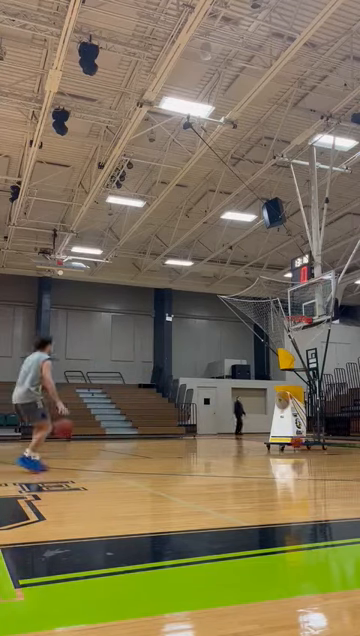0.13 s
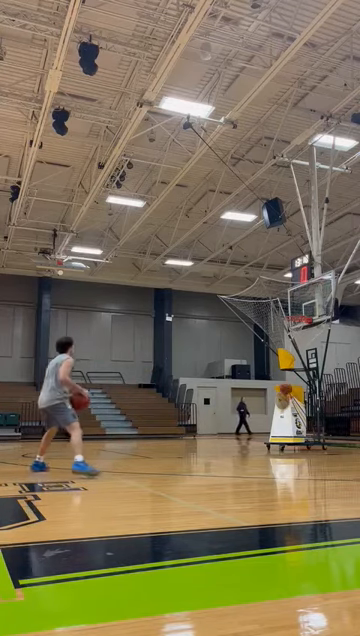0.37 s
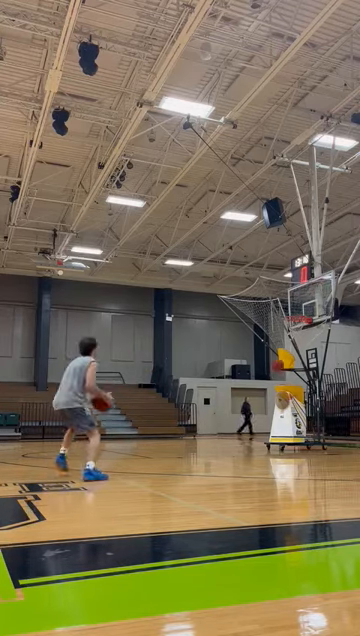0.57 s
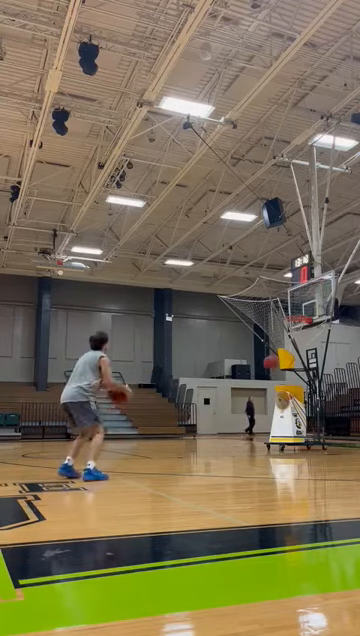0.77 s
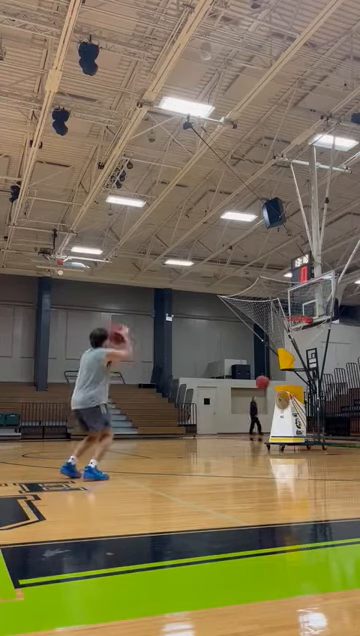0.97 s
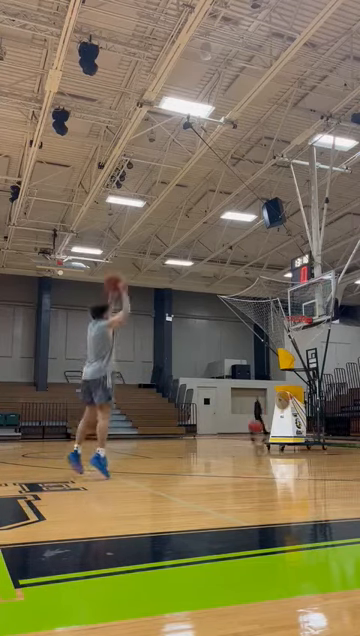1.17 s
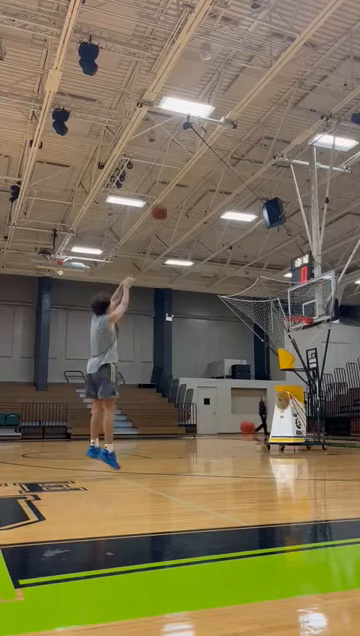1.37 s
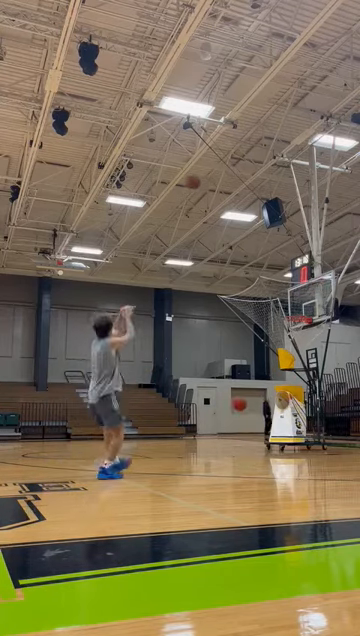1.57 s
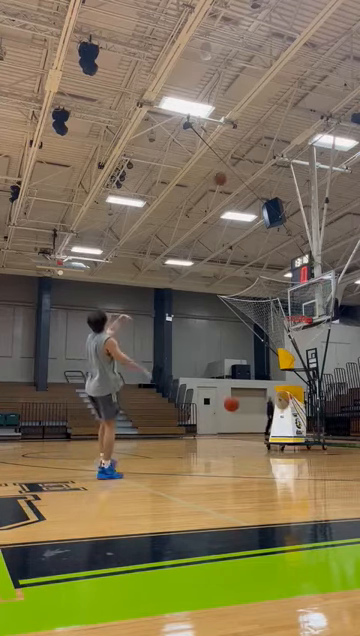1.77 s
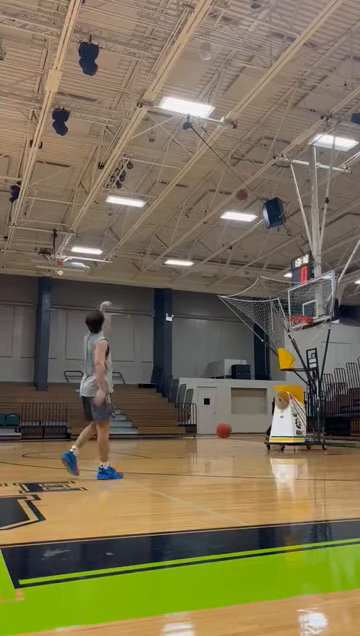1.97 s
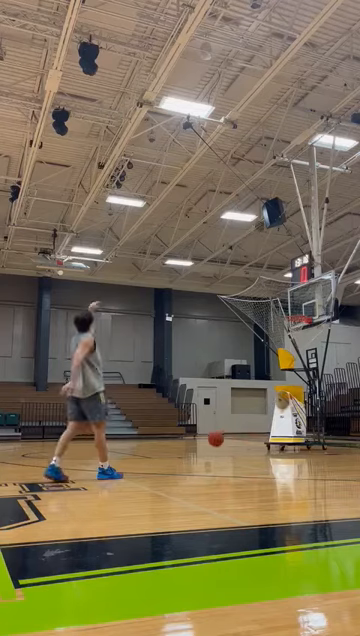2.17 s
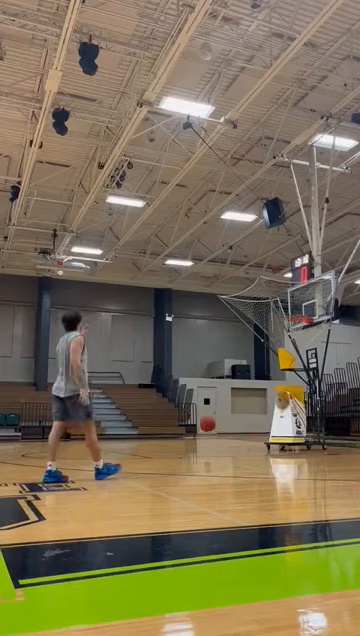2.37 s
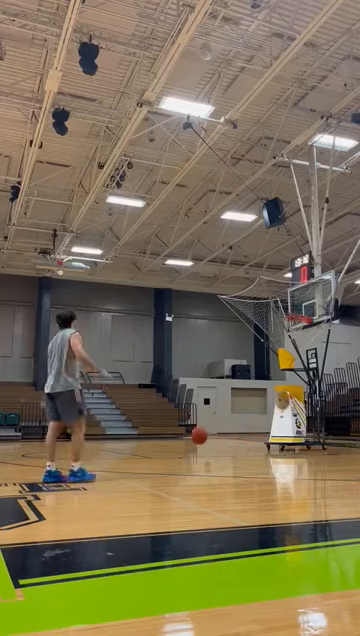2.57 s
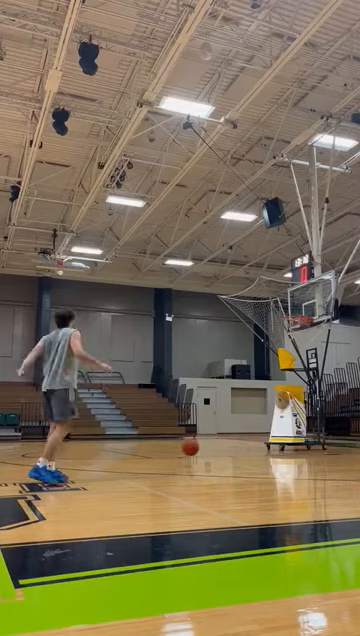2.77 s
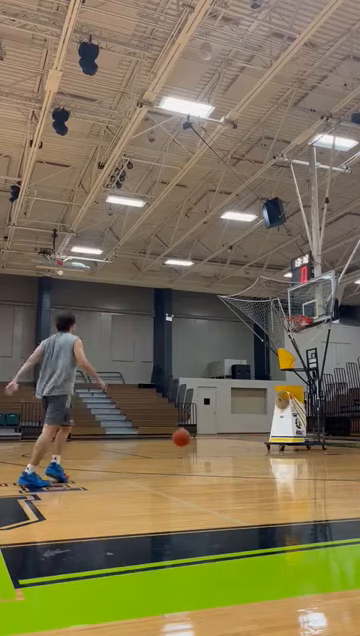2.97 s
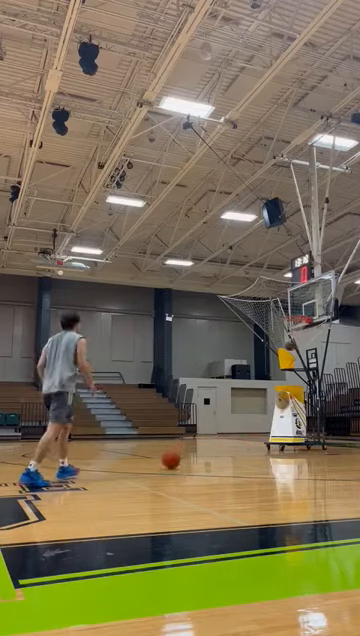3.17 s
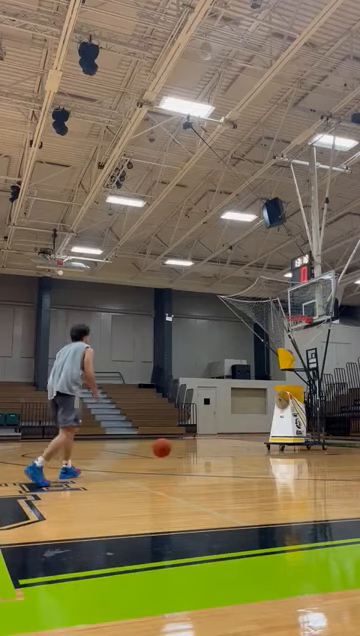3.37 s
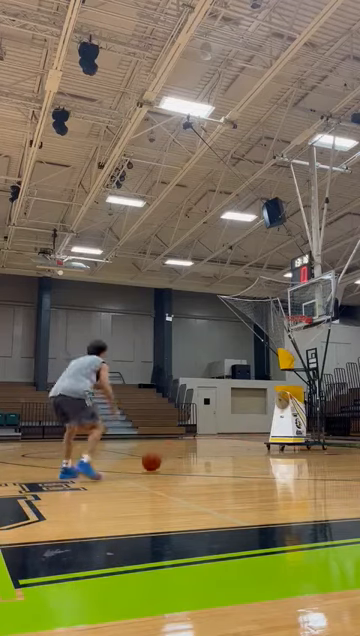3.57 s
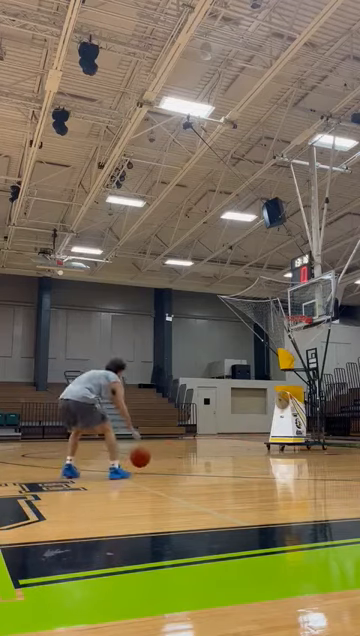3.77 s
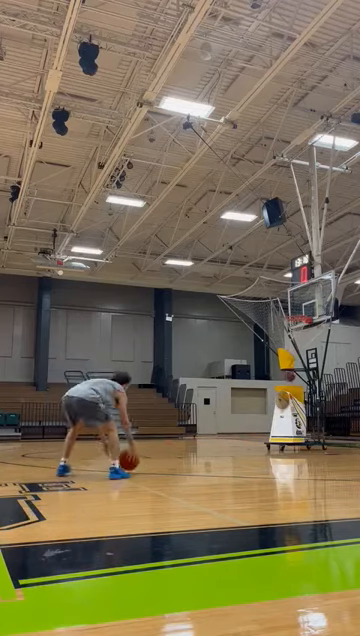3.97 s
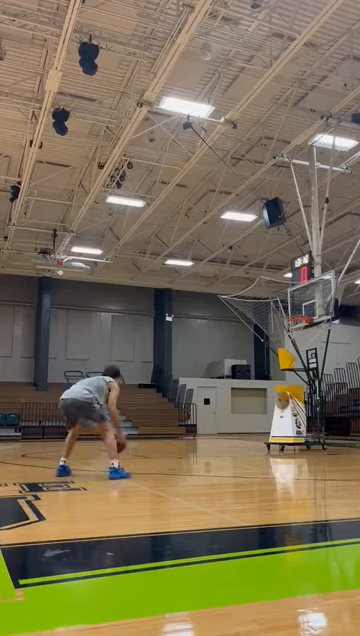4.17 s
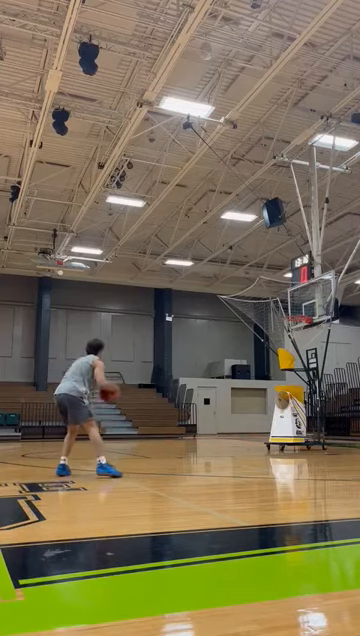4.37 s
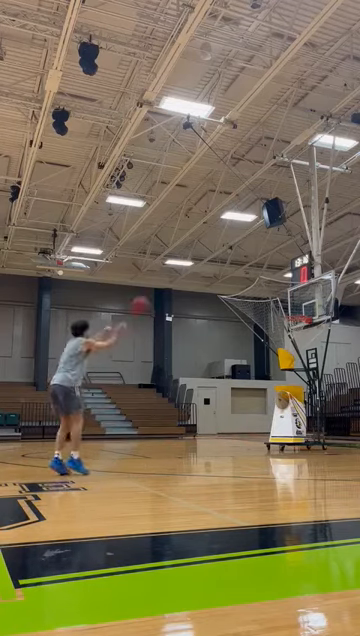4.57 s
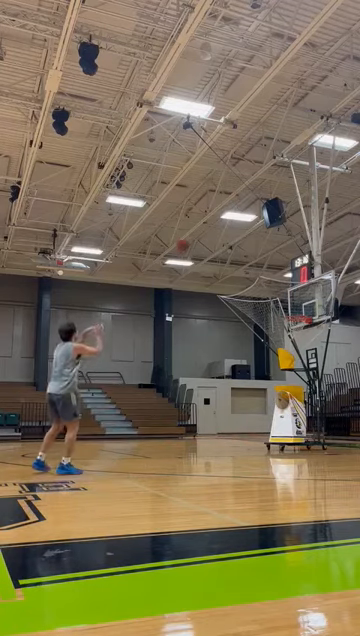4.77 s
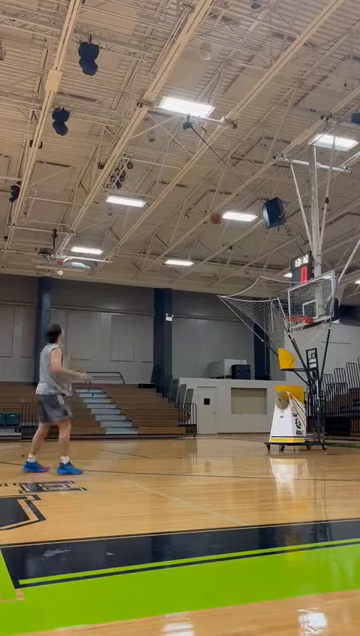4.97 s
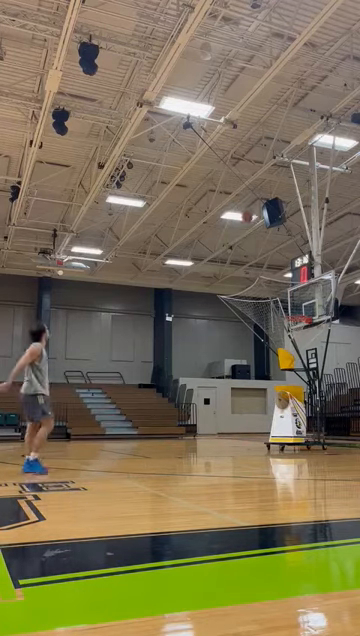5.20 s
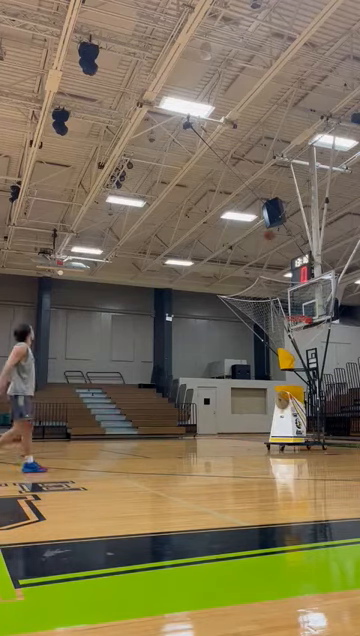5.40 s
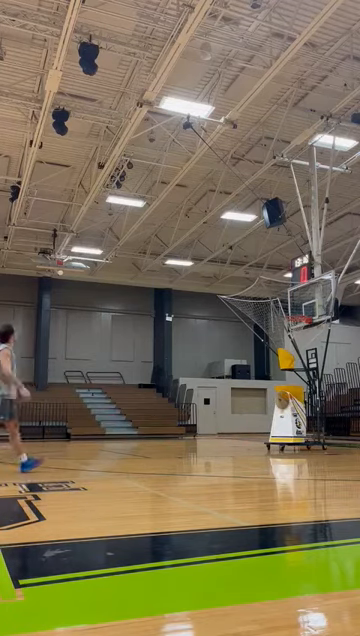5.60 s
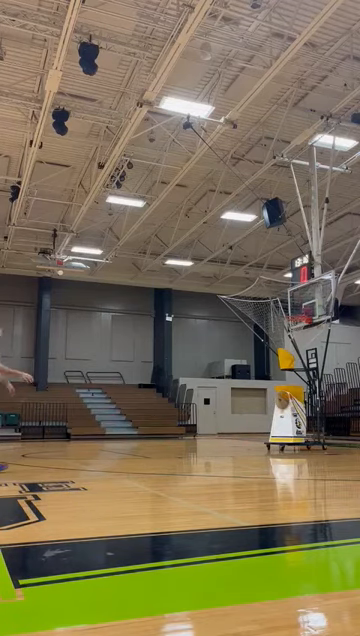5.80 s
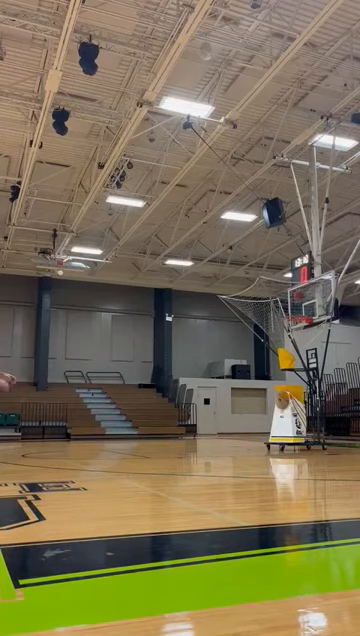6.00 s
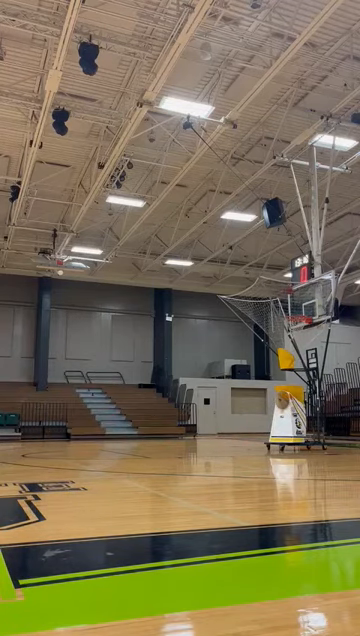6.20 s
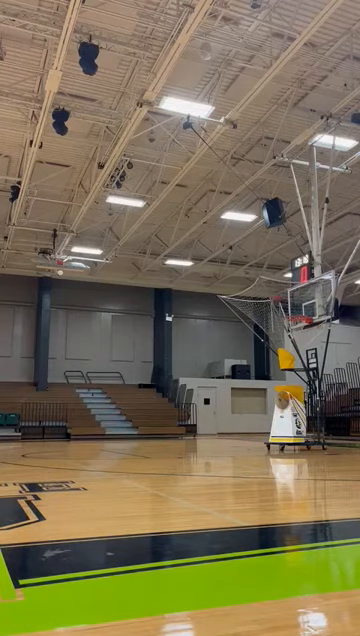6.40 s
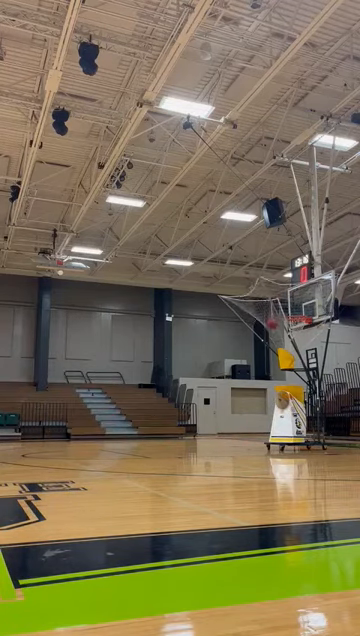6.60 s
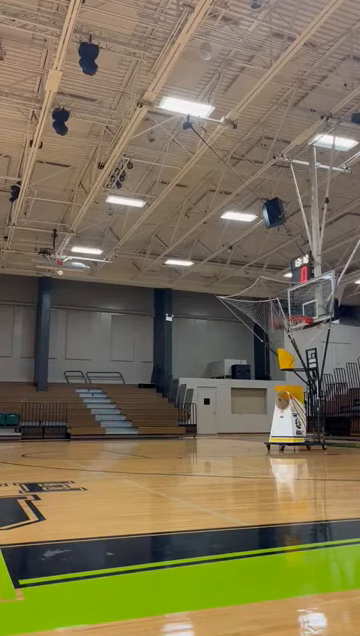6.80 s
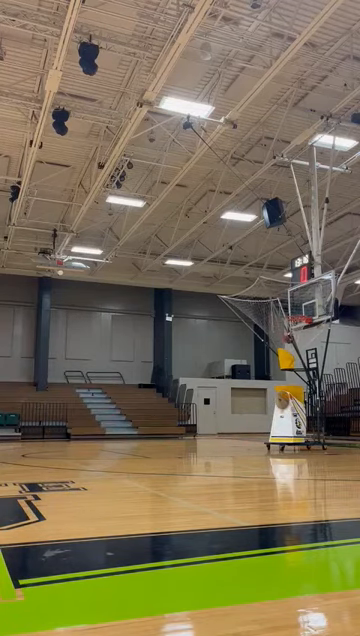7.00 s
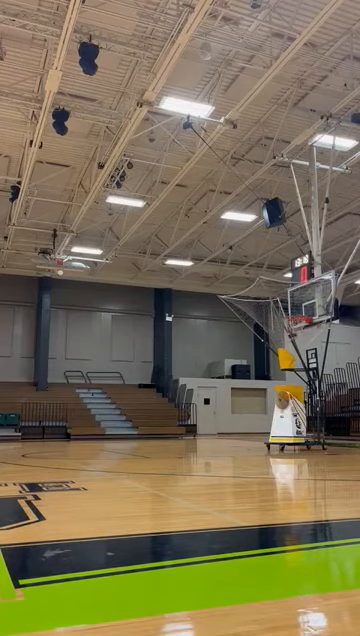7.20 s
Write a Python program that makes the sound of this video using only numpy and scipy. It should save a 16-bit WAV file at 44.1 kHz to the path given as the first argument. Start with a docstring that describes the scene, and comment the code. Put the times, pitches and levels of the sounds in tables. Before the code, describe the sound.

A basketball bounces unevenly on hardwood in an echoing gym, with brief shoe squeaks, metal clinks and a thud against the backboard.

```python
"""Ventilation and mains hum fill a large gym, heard through a phone's two microphone ports.
From 0.1 s a basketball bounces: its skin slaps, the air inside rings, the sprung hardwood thumps.
Soles squeak, dull thumps sound; the hall rings. At 2.6 s a shot drops into a catching net: poles
knock, cord rustles, the metal frame clinks. At 5.9 s the hoop shivers and the backboard thuds;
more low thumps, metal clinks and one dull echo follow."""
import sys
import numpy as np
from scipy import signal
from scipy.fft import rfft, irfft, next_fast_len
from scipy.io import wavfile
from scipy.ndimage import uniform_filter1d

SR = 44100
rng = np.random.default_rng(int(sys.argv[2]) if len(sys.argv) > 2 else 0)


def file_out(sig):
    """Save sig as 16-bit WAV at sys.argv[1]."""
    # one column per channel
    cols = np.atleast_2d(sig).T
    # limit, then scale
    lim = np.clip(cols, -1, 1)
    pcm = np.round(lim * 32767).astype(np.int16)
    wavfile.write(sys.argv[1], SR, pcm)


N = 319725

# ventilation spectrum: f/Hz, level/dB
VENT_TONE = [(15, -65), (25, -6), (47, 5.5), (124, -5), (148, -9.5), (181, -11.5), (251, -15), (277, -15.5),
             (425, -13), (519, -18), (619, -20), (3760, -35), (7040, -48), (10000, -65), (13000, -109),
             (22000, -120)]
# mains hum: f/Hz, rms level/dB
HUM_LINES = [(59.2, -51.5), (118.4, -49.5), (172.3, -56), (290.7, -60.5), (484.5, -64.5)]
# ball blows: t/s, slap level/dB, thump, sheen and hall send/dB re slap, left minus right/dB,
# lowest air mode/Hz, bending wave delay at 100 Hz/s
BALL_HITS = [(0.108, -16, 7, -5, 19.5, 1.5, 1300, 0.00693), (0.119, -29.5, -6.5, -6, 10, 1.5, 1310, 0.0094),
             (0.192, -15.5, 4.5, -12.5, 21.6, 0, 1076, 0.01362),
             (1.3283, -16.5, 0.5, -14, 18.2, 3, 1050, .011), (2.15, -26, 6.5, -14, 15.5, 3, 1210, 0.00828),
             (2.16, -31.5, -5, -13, 8, -1.5, 1180, 0.0084), (2.633, -38, -0.5, -9, 18, 3.5, 1400, .01),
             (2.691, -33, 2, -8, 26, -3, 1460, .01), (2.768, -26.5, 8, -31, 12.4, 0.5, 1340, 0.00648),
             (3.253, -34, 9.5, -0.5, 19, -1, 1300, 0.00805), (3.627, -35, 6, -4, 24.4, 1.5, 1660, 0.0077),
             (3.917, -41.5, 6, -9, 24, -2, 1160, 0.0078), (4.047, -46, -6, -16.5, 30, 0, 1130, .008),
             (5.9, -32.5, -3, -8, 20, 0.5, 1170, 0.01097), (5.917, -31, 6.5, -2, 21, 3, 1330, 0.00824)]
# air in the ball: f/lowest mode, level/dB
BALL_MODES = [(1.002, 8.5), (1.45, -8), (2.1, -18.5), (3.1, -8.5), (4.2, -14)]
# sprung boards: f/thump pitch, level/dB, t60/s
BOARD_MODES = [(0.651, -22.5, 0.1), (0.999, 12.5, 0.038), (1.5, 7.5, 0.025), (2.101, 7.5, 0.023),
               (3.502, 2.5, 0.015), (5.299, -3.5, 0.035)]
# spectra of a bounce: f/Hz, level/dB
SHEEN_TONE = [(1500, -31.5), (3500, 8.5), (8000, 5.5), (12000, -23.5)]  # pebbled rubber
SMACK_TONE = [(300, -18), (700, -13.5), (1500, 13.5), (3500, -14), (6000, -24.5), (10000, -8)]  # skin meeting the floor
KNOCK_TONE = [(90, -27.5), (200, 7), (400, -1.5), (900, -0.5), (1800, -3), (3500, -30.5)]  # blow carried by the boards
SLAP_SEND_TONE = [(100, -21), (250, -9), (600, 6.5), (1300, -1), (2500, -7), (5000, -12.5), (9000, -21)]  # slap averaged over all directions
# slipping soles: t/s, length/s, start f/Hz, end f/Hz, level/dB, octave/dB re tone, waver/0-1,
# hall send/dB, stick-slip depth/0-1
SOLE_SLIPS = [(0.198, 0.018, 4454, 4256, -30.5, 1.5, 0.2, -3.5, 0.8),
              (2.88, 0.016, 4230, 4110, -37.5, -37, 0.1, -11, .05),
              (2.921, 0.032, 4250, 4230, -36.5, -21, 0, -17, .05),
              (4.54, 0.04, 4500, 4264, -41, -17, 0.2, -21, 0.5),
              (4.553, 0.022, 4140, 4554, -39, -3.5, 0.14, -2, 0.3)]
# dull low thumps, some with a light tap: t/s, thump level/dB, thump f/Hz, tap level/dB
LOW_THUMPS = [(0.484, -25.5, 80.5, -29.5), (0.535, -35, 88, -36.5), (0.734, -26.5, 139.7, -32.5),
              (0.817, -32, 108.5, -58), (1.652, -34, 65, -52), (1.775, -35, 103, -54),
              (2.195, -21.5, 86, -55), (2.981, -22, 88.5, -39), (3.294, -31.5, 100, -55),
              (4.179, -34.5, 74.3, -54.5), (5.792, -32.5, 78.6, -63), (5.974, -22.5, 72.3, -50.5),
              (6.069, -23.5, 84, -46), (6.2, -26, 93.4, -56), (6.439, -30.5, 84.3, -52.5)]
# light tap: f/Hz, level/dB
TAP_TONE = [(250, -5), (500, 5), (1100, 1.5), (2000, -21.5), (4000, -40.5)]
# jolts of the net's poles: t/s, level/dB, tilt/(dB/octave)
POLE_JOLTS = [(2.633, -43, 12), (2.693, -42, 17), (2.71, -45, 21), (2.845, -31, -6), (2.863, -38.5, 1),
              (2.952, -29, -0.5), (2.99, -37, 5), (3.02, -30, -9.5)]
# pole resonances: f/Hz, level/dB, t60/s
POLE_MODES = [(276.7, 0.5, 0.12), (873, 1, 0.087), (1386, -9, 0.09)]
# net and clothes moving: t/s, hold/s, rustle level/dB, stand shake level/dB
RUSTLES = [(2.639, 0.024, -45, -40), (2.7, 0.031, -42.5, -38), (2.759, 0.2, -48, -37.5),
           (2.999, 0.33, -58, -43.5), (4.2, 0.22, -56.5, -48), (4.56, 0.16, -57.5, -56),
           (4.779, 0.23, -62, -46), (4.892, 0.042, -56.5, -69), (5.904, 0.028, -44, -38),
           (5.96, 0.24, -60, -43)]
# rustle spectra: f/Hz, level/dB
RUB_TONE = [(500, 4.5), (1200, 2), (3000, -1), (5000, -5), (8000, -8), (10000, -7)]  # cord and cloth; also joint chatter
STAND_TONE = [(50, 4.5), (90, 2.5), (200, -5.5), (300, -4.5), (500, -12), (900, -13.5), (1500, -19),
              (3000, -46)]  # shaken stand
# metal clinks and one dull echo (7.195 s):
# t/s, level/dB, left minus right/dB, ringing share/0-1, tilt/(dB/octave)
METAL_CLINKS = [(2.8349, -30, -1, 0.58, 7), (2.949, -29.5, 0, 0.39, 0.1), (3.371, -42.5, 3, 0.7, 0.1),
                (3.4096, -26, 0, 0.79, -0.3), (4.1722, -43.5, -5, 0.05, -6), (6.241, -51, 4, 0.44, 5),
                (6.5889, -32, 0, 0.76, 0.5), (6.6824, -39.5, 0, 0.62, -2), (6.8777, -47.5, 7, 0.43, 1),
                (7.1503, -23, 1, 0.85, 3.5), (7.195, -29, -1, 0.9, -5.5), (7.2444, -31.5, 4, 0.84, 1)]
# frame tubes: f/Hz, level/dB, t60/s
TUBE_MODES = [(1525, -3, 0.081), (2440, -1, 0.058), (3468, 0.5, 0.05), (4584, 1.5, 0.045),
              (5520, -29, 0.045), (6570, 3, 0.067), (7230, 3, 0.02), (8125, 15, 0.018), (9320, 12, 0.025)]
# hoop striking its board: t/s, level/dB
HOOP_SHIVERS = [(5.901, -32.5), (5.924, -37.5), (5.939, -43), (6.012, -44), (6.038, -44.5)]
# hoop resonances: f/Hz, level/dB, t60/s
HOOP_MODES = [(1300, -5, 0.037), (2230, 1.5, 0.039), (3660, 0, 0.021)]
# hall decay: f/Hz, t60/s
HALL_DECAY = [(40, 0.24), (80, 2.1), (160, 1.5), (320, 1.8), (640, 1.14), (1280, 1.82), (2560, 1.81),
              (4300, 1.43), (6000, 1.17), (9000, 0.8)]
# hall and phone responses: f/Hz, level/dB
TAIL_TONE = [(40, 5), (100, 0.5), (160, -1.5), (220, -3.5), (285, 0), (360, 0), (480, 0), (580, 6),
             (690, -2.5), (880, -4), (1300, -5), (2500, -1), (4500, 1.5), (8000, 0)]
ROOF_ECHO_TONE = [(150, -15.5), (400, -9.5), (620, 3), (900, -9), (2000, 1), (6000, 0.5), (9000, -15)]
MIC_RESPONSE = [(15, -37.5), (60, 0.5), (5000, 4), (6300, 0.5), (9000, 0), (10000, -16), (11500, -1),
                (12500, -50.5)]
# stereo width of diffuse sound, very wide near 6 kHz: f/Hz, side over mid/dB
STEREO_WIDTH = [(100, -87.5), (250, -27.5), (500, -4.5), (1500, -3.5), (2500, 0.5), (5500, -4.5),
                (5900, 22), (6600, 42.5), (7000, -11), (8900, -8), (9600, 18)]

HIT_SAMPLES = 8192
HIT_TIME_S = np.arange(HIT_SAMPLES) / SR
SPOTS = 3  # floor positions, each with its own hall response


def undb(db):
    return 10 ** (np.asarray(db) / 20)


def unit(x):
    return x / np.abs(x).max()


def impulse(at_sample):
    return signal.unit_impulse(HIT_SAMPLES, at_sample)


def at_bins(table, size):
    """(f/Hz, value) rows interpolated to FFT bins."""
    hz, value = np.transpose(table)
    return np.interp(np.log(np.fft.rfftfreq(size, 1 / SR) + 1), np.log(hz), value)


def colour(x, table):
    """Zero-phase filter from (f/Hz, level/dB) rows."""
    size = next_fast_len(x.shape[-1] + 4096)
    return irfft(rfft(x, size) * undb(at_bins(table, size)), size)[..., :x.shape[-1]]


def ring(modes, spread, size=HIT_SAMPLES, tilt_db_oct=0):
    """Decaying sines, each detuned at random by a relative spread."""
    t, out = np.arange(size) / SR, 0
    for hz, db, t60_s in modes:
        sine = np.sin(2 * np.pi * hz * (1 + spread * rng.standard_normal()) * t)
        out = out + undb(db + tilt_db_oct * np.log2(hz)) * sine * np.exp(-np.log(1000) * t / t60_s)
    return out


def place(bus, start_s, direct, send, pan_db=0, spot=0):
    """Add to bus rows left, right (one sample later) and the spot's hall send."""
    left, right = direct * undb(pan_db / 2), direct * undb(-pan_db / 2)
    for row, part, lag in (0, left, 0), (1, right, 1), (2 + spot, send, 0):
        i = int(start_s * SR) + lag
        bus[row, i:i + len(part)] += part[:N - i]


def diffuse(pair):
    """Two unrelated signals become left and right, with a stereo width set by frequency."""
    size = next_fast_len(N)
    power_ratio = undb(2 * at_bins(STEREO_WIDTH, size))
    gains = np.sqrt([1 / (1 + power_ratio), power_ratio / (1 + power_ratio)])
    mid, side = irfft(rfft(pair, size) * gains, size)[:, :N]
    return np.array([mid + side, mid - side])


def ventilation(rms_db=-41.5):
    """Broad air noise from all sides."""
    air = colour(rng.standard_normal((2, N)), VENT_TONE)
    return diffuse(air / air.std() * undb(rms_db))


def mains_hum():
    """Steady sines, equal left and right."""
    t = np.arange(N) / SR
    return sum(np.sqrt(2) * undb(db) * np.sin(2 * np.pi * (hz * t + rng.random()))
               for hz, db in HUM_LINES)


def bending_wave(x, delay_100hz_s):
    """Waves four times higher arrive in half the time: a blow becomes a falling chirp."""
    hz = np.fft.rfftfreq(len(x), 1 / SR)
    lag_cycles = 2 * delay_100hz_s * np.sqrt(100 * hz)
    return unit(irfft(rfft(x) * np.exp(-2j * np.pi * lag_cycles), len(x)))


def board_thump(hz, travel_s=0, push_s=0.0021, swell_cycles=0.4):
    """A soft push rings the boards; bass bending waves are slower, so low modes swell later."""
    boards = 0
    for ratio, db, t60_s in BOARD_MODES:
        swell = 1 - np.exp(-HIT_TIME_S * ratio * hz / swell_cycles)
        boards = boards + ring([(ratio * hz, db, t60_s)], spread=0.031) * swell
    push = np.hanning(int(push_s * SR) + 2)
    return bending_wave(np.convolve(boards, push)[:HIT_SAMPLES], travel_s)


def ball_bounces(bus, slap_s=0.0045, air_t60_s=0.009, floor_hz=113.7):
    """The skin slaps and rings the air inside; the floor's thump swells just after."""
    envelope = np.sqrt(HIT_TIME_S / slap_s) * np.exp(-(HIT_TIME_S / slap_s) ** 2)
    slap_send = np.roll(colour(impulse(512), SLAP_SEND_TONE), -480)
    for n, (start_s, db, thump_db, sheen_db, send_db, pan_db, air_hz, travel_s) in enumerate(BALL_HITS):
        contact = rng.standard_normal(HIT_SAMPLES) * envelope
        modes = [(air_hz * ratio, mode_db, air_t60_s) for ratio, mode_db in BALL_MODES]
        air = unit(signal.fftconvolve(contact, ring(modes, spread=0.025))[:HIT_SAMPLES])
        sheen = undb(sheen_db) * unit(colour(contact, SHEEN_TONE))
        smack = undb(-1.5) * unit(colour(contact, SMACK_TONE))
        knock = undb(-4) * bending_wave(colour(impulse(20), KNOCK_TONE), travel_s)
        slap = undb(db) * (air + sheen + smack - knock)
        place(bus, start_s - 0.001, slap, slap_send * undb(db + send_db), pan_db, spot=n % SPOTS)
        thump = undb(db + thump_db) * board_thump(floor_hz, travel_s)
        place(bus, start_s, thump, thump * undb(-5.5), spot=n % SPOTS)


def hall(send, tail_db=-30.5, rise_s=0.0017, clump_db=2.5, roof_db=-25, roof_s=0.035, smear_s=0.006):
    """A dense tail whose bands die at their own rates, plus a roof echo smeared by trusses."""
    size = next_fast_len(2 * SR)
    t, tail = np.arange(size) / SR, 0
    spectrum = rfft(rng.standard_normal((2, size)))
    for band_hz, t60_s in HALL_DECAY:
        band = at_bins([(hz, float(hz == band_hz)) for hz, _ in HALL_DECAY], size)
        tail = tail + irfft(spectrum * band, size) * np.exp(-np.log(1000) * t / t60_s)
    clumps = uniform_filter1d(rng.standard_normal(size), size=900)  # uneven returns from far walls
    tail *= undb(clump_db * clumps / clumps.std() * np.exp(-t / 0.5))
    tail = colour(undb(tail_db) * tail * (1 - np.exp(-t / rise_s)), TAIL_TONE)
    roof = rng.standard_normal((2, size)) * (t > roof_s) * np.exp(-np.abs(t - roof_s) / smear_s)
    response = tail + undb(roof_db) * colour(roof, ROOF_ECHO_TONE)
    return diffuse(signal.fftconvolve(send[None], response)[:, :N])


def sole_squeaks(bus, slip_hz=328):
    """Rubber grips and lets go: a wavering tone and its octave, which beams at the phone."""
    for start_s, length_s, start_hz, end_hz, db, octave_db, waver, send_db, depth in SOLE_SLIPS:
        n = int(length_s * SR)
        wobble = uniform_filter1d(rng.standard_normal(n), size=60)
        hz = np.linspace(start_hz, end_hz, n) * (1 + waver * (wobble - wobble.mean()))
        phase = 2 * np.pi * np.cumsum(hz) / SR
        stick_slip = 1 + depth * np.cos(2 * np.pi * slip_hz * np.arange(n) / SR)
        envelope = undb(db) * np.hanning(n) ** 0.42 * stick_slip
        tone = envelope * np.sin(phase)
        octave = envelope * undb(octave_db) * np.sin(2 * phase)
        place(bus, start_s, tone + octave, undb(send_db) * (tone + undb(-12.5) * octave), pan_db=2)


def dull_thumps(bus):
    """Dull low thumps, some with a light tap."""
    window = np.pad(np.hanning(90), (40, HIT_SAMPLES - 130))
    for start_s, thump_db, thump_hz, tap_db in LOW_THUMPS:
        tap = unit(colour(rng.standard_normal(HIT_SAMPLES) * window, TAP_TONE))
        thump = undb(thump_db) * board_thump(thump_hz) + undb(tap_db) * tap
        place(bus, start_s, thump, thump * undb(-4.5))


def pole_knocks(bus):
    """The caught ball jolts the poles that hold the net."""
    for start_s, db, tilt_db_oct in POLE_JOLTS:
        pole = ring(POLE_MODES, spread=0.016, tilt_db_oct=tilt_db_oct)
        knock = undb(db) * unit(np.convolve(np.hanning(12), pole))
        place(bus, start_s, knock, knock * undb(-7))


def net_rustle(attack_s=0.0037, rub_fade_s=0.029, shake_fade_s=0.045):
    """Cord and cloth rub, the shaken stand rumbles; both arrive mostly from the walls."""
    t, out = np.arange(N) / SR, 0
    starts_s, holds_s, rub_db, shake_db = np.transpose(RUSTLES)
    for levels_db, tone, fade_s in (rub_db, RUB_TONE, rub_fade_s), (shake_db, STAND_TONE, shake_fade_s):
        envelope = 0
        for start_s, hold_s, db in zip(starts_s, holds_s, levels_db):
            attack = np.clip((t - start_s) / attack_s, 0, 1)
            fade = np.exp(-np.maximum(t - start_s - hold_s, 0) / fade_s)
            envelope = envelope + undb(db) * attack * fade
        grain = undb(26 * uniform_filter1d(rng.standard_normal(N), size=400))
        noise = colour(rng.standard_normal((2, N)) * grain, tone)
        out = out + noise / noise.std() * envelope
    return diffuse(out) + hall(undb(-5.5) * out[0])


def metal_clinks(bus, attack_s=0.00029, chatter_s=0.018, drive_s=0.014):
    """Loose joints chatter and ring the tubes in close mode pairs; one dull row sounds as an echo."""
    t = HIT_TIME_S
    for start_s, db, pan_db, ring_share, tilt_db_oct in METAL_CLINKS:
        joints = rng.standard_normal(HIT_SAMPLES) * (1 - np.exp(-t / attack_s)) * np.exp(-t / chatter_s)
        pairs = ring(TUBE_MODES + TUBE_MODES, spread=0.01, tilt_db_oct=tilt_db_oct)
        tubes = undb(db) * unit(signal.fftconvolve(joints * np.exp(-t / drive_s), pairs)[:HIT_SAMPLES])
        chatter = undb(db) * (1 - ring_share) * unit(colour(joints, RUB_TONE))
        send = undb(4.5) * chatter + undb(-12) * tubes
        place(bus, start_s - 0.001, chatter + ring_share * tubes, send, pan_db)


def hoop_shiver(bus):
    """The hoop rattles against its board; each contact is a noise burst that rings it."""
    for start_s, db in HOOP_SHIVERS:
        contact = rng.standard_normal(90)
        shiver = undb(db) * unit(np.convolve(contact, ring(HOOP_MODES, spread=0.026, size=4096)))
        place(bus, start_s, shiver, shiver * undb(-6))


def backboard_thud(bus, start_s=5.909, db=-21.5, hz=221):
    """The struck board rings like the floor, pitched higher."""
    thud = undb(db) * board_thump(hz)
    place(bus, start_s, thud, thud * undb(-17.5))


def scene():
    """Diffuse layers, then each bus as direct sound plus hall."""
    out = ventilation() + mains_hum() + net_rustle()
    ball_bus, other_bus = np.zeros((2 + SPOTS, N)), np.zeros((3, N))
    ball_bounces(ball_bus)
    sole_squeaks(other_bus)
    dull_thumps(other_bus)
    pole_knocks(other_bus)
    metal_clinks(other_bus)
    hoop_shiver(ball_bus)
    backboard_thud(ball_bus)
    for bus in ball_bus, other_bus:
        out += bus[:2] + sum(hall(send) for send in bus[2:])
    return out


def record(dry, cutoff_hz=13055):
    """The phone thins the deep bass, dulls the top and cuts above it."""
    lowpass = signal.ellip(8, 0.2, 70, cutoff_hz, fs=SR, output="sos")
    return signal.sosfilt(lowpass, colour(dry, MIC_RESPONSE))


dry = scene()
out = record(dry)
file_out(out)
```